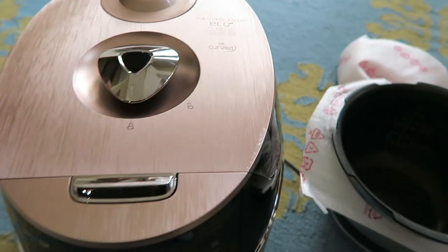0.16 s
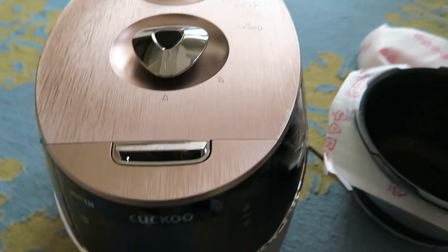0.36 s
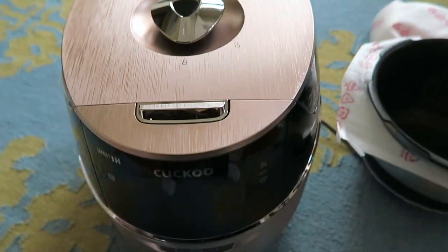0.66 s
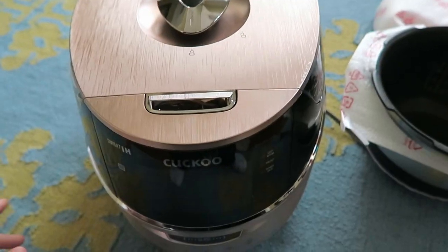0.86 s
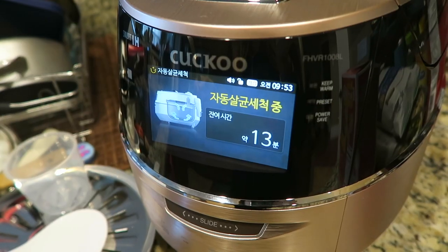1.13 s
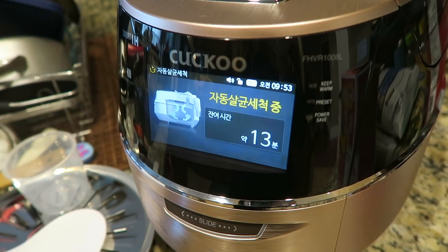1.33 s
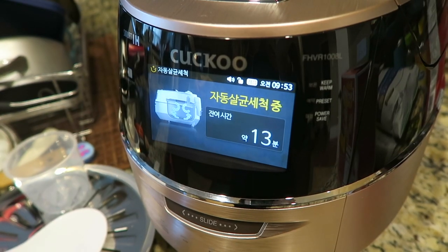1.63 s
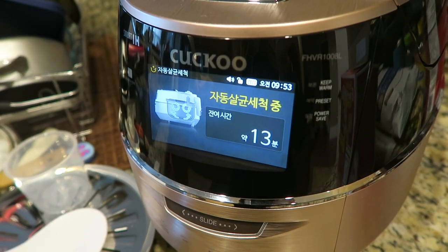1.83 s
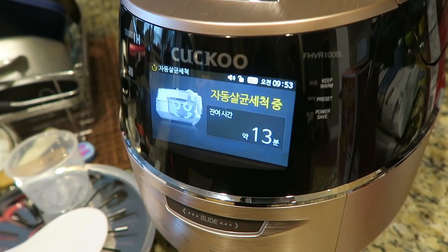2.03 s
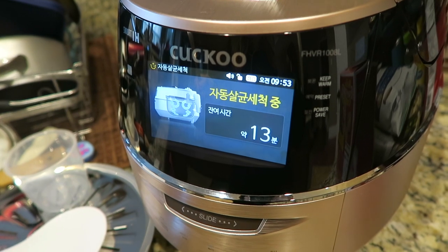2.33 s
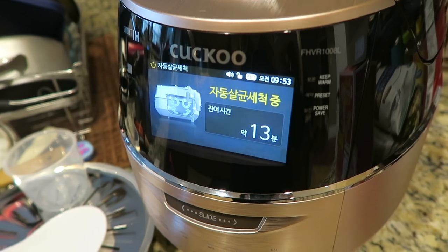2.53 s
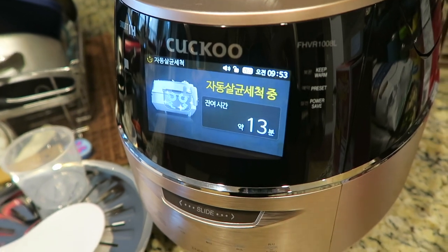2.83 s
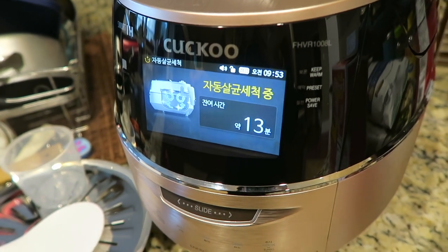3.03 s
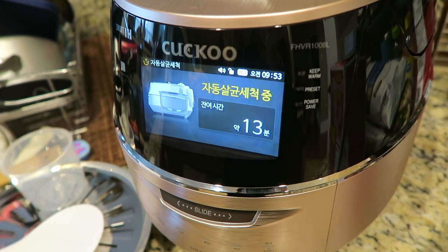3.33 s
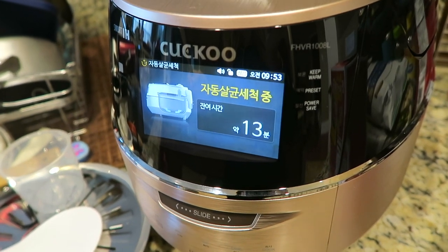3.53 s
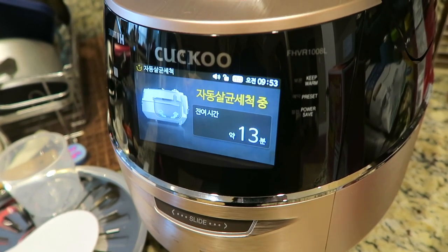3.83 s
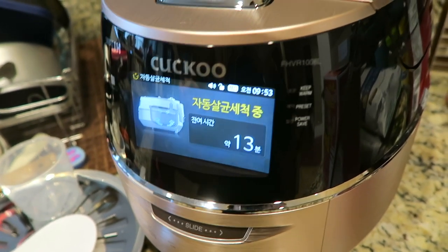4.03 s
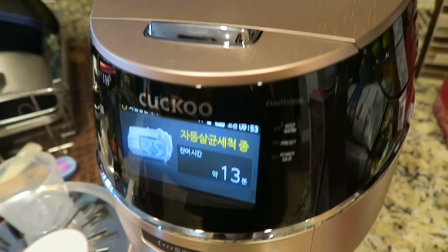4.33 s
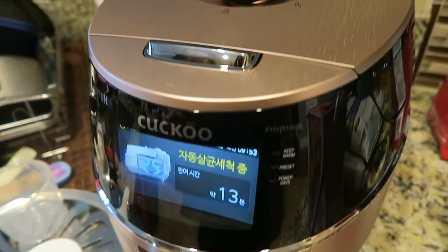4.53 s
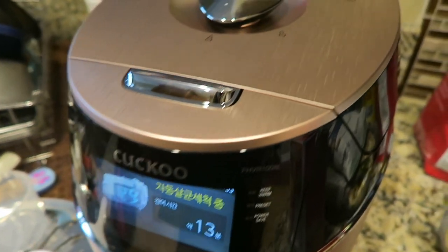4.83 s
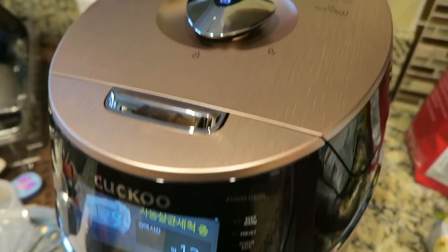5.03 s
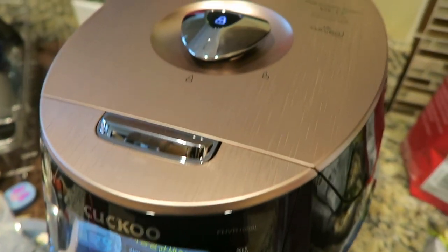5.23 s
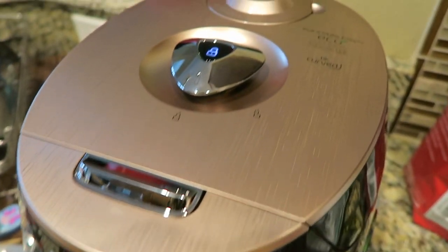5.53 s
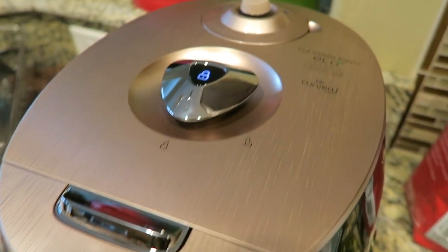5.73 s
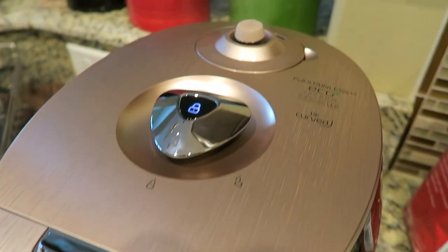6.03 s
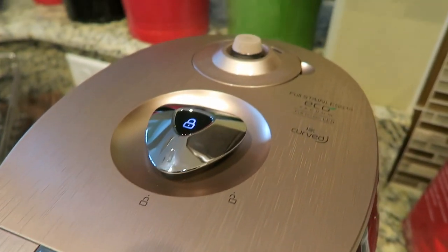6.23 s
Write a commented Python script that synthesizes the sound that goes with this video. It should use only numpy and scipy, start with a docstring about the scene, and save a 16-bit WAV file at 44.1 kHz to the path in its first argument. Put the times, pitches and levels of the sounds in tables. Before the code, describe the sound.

From 0 to 0.97 seconds the room is almost quiet: soft air and a faint low appliance hum that slowly sinks. A hand meets a cooker lid with a soft, dull knock at 0.04 and a weaker one at 0.13, and a light rustle slides off by about 0.25. At 0.97 it cuts abruptly to a loud, close rice cooker venting. Steam spurts in irregular puffs, about ten a second, bright and breathy with a rough sputter, never wholly stopping between them; sharper spurts come near 2.2 and 2.5. Boiling water rumbles low beneath, with small gurgles near 2.1, 4.6, 4.8 and 6.2. From 4 to 5.3 the microphone rises above the lid and the hiss changes colour. From about 5 a faint, thin, wavering mid-low tone lies underneath. Short reflections suggest a kitchen counter. Venting continues to the end, about 6.4.

```python
"""First a near-quiet room: an appliance hum, a soft knock of a hand on a lid, and a rustle as it slides off.
Then the scene changes: a rice cooker vents, its weighted valve rocking and letting out steam in uneven puffs,
about ten a second. The steam is noise shaped by valve flow, vent resonances and short echoes. Under it water
rumbles and gurgles (shaped noise), and late on a thin tone (a wavering sine) sounds. Hum and knock are steady
and decaying sines."""
import sys
import numpy as np
from scipy import signal
from scipy.fft import rfft, irfft, next_fast_len
from scipy.io import wavfile
from scipy.ndimage import uniform_filter1d, minimum_filter1d, map_coordinates

SR = 44100
rng = np.random.default_rng(int(sys.argv[2]) if len(sys.argv) > 2 else 0)


def inscribe(sig):
    """Save sig as 16-bit PCM at rate SR to the path in sys.argv[1].

    A 1-D sig is mono; a 2-D sig holds one channel per row.
    Samples are clipped to [-1, 1] before scaling.
    """
    pcm = np.round(np.clip(np.atleast_2d(sig).T, -1, 1) * 32767)
    wavfile.write(sys.argv[1], SR, pcm.astype(np.int16))


N = 281313


def amp(db):
    """Decibels to gain."""
    return 10 ** (np.asarray(db) / 20)


def unit(x):
    """Scale to rms 1."""
    return x / np.sqrt(np.mean(x ** 2) + 1e-20)


def along(points, hz):
    """Read (frequency, value) points on a log frequency axis."""
    f, v = np.transpose(points)
    return np.interp(np.log(hz + 1), np.log(f + 1), v)


def curves(rows):
    """Draw one value per sample for each column after the time."""
    s, *columns = np.transpose(rows)
    return [np.interp(np.arange(N) / SR, s, column) for column in columns]


def wobble(rate):
    """A smooth random curve, rate knots a second."""
    knots = rng.standard_normal(int(N * rate / SR) + 4)
    return map_coordinates(knots, [np.arange(N) * rate / SR])


def filtered(x, response):
    """Multiply the spectrum of x by a response of frequency, zero-padded against wrap-around."""
    m = next_fast_len(N + SR // 2)
    return irfft(rfft(x, m) * response(np.fft.rfftfreq(m, 1 / SR)), m)[..., :N]


def rush(spectrum, alike, patchy_db):
    """Turbulence: coloured stereo noise of rms 1 whose gain varies in random time-frequency patches."""
    z = signal.stft(rng.standard_normal((2, N)), nperseg=512)[2]
    field = rng.standard_normal(z.shape[1:])
    field = uniform_filter1d(uniform_filter1d(field, size=6, axis=0), size=6, axis=1)
    pair = signal.istft(z * amp(patchy_db * unit(field)), nperseg=512)[1][:, :N]

    def mid_side(hz):
        # this angle gives left and right the wanted correlation
        turn = np.arccos(np.clip(along(alike, hz), -1, 1)) / 2
        return amp(along(spectrum, hz)) * [np.cos(turn), np.sin(turn)]

    mid, side = filtered(pair, mid_side)
    return unit(np.array([mid + side, mid - side]))


# colour of the room air: (frequency [Hz], relative density [dB per Hz])
ROOM_COLOUR = [(25, -12), (141, -10.5), (192, -11), (260, -10), (445, -10), (620, -19.5), (980, -17.5),
               (1250, -25.5), (2500, -27.5), (11700, -48.5), (13000, -70)]
# stereo width of the room air: (frequency [Hz], left-right correlation [-1 to 1])
ROOM_WIDTH = [(40, .99), (130, 0.54), (290, -0.51), (950, -0.37), (3770, .05)]
ROOM_DB = -50
# appliance hum, before its drift and balance: (frequency [Hz], level [dB])
HUM_TONES = [(118, -64.5), (192, -50), (436, -59), (463, -66)]
# a hand meets the lid: (time [s], level [dB])
KNOCKS = [(.043, -30.5), (.135, -40.5)]
# ringing modes of the lid: (frequency [Hz], relative level [dB], 60 dB decay time [s])
LID_MODES = [(206, 1.5, 0.071), (456, 4, 0.049), (720, -2, 0.036)]
# the hand slides off: (time [s], level [dB])
RUSTLE_LEVEL = [(0, -63), (.06, -54.5), (.14, -59), (.24, -78)]
# colour of skin on the lid: (frequency [Hz], relative density [dB per Hz])
SKIN_COLOUR = [(500, -12), (1000, 0), (4000, -8), (15500, -26)]


def quiet_room():
    """Noise for room air, sinking sines for hum, decaying lid modes for the knock, noise for the rustle."""
    t = np.arange(N) / SR
    hum = np.zeros(N)
    for hz, db in HUM_TONES:
        level_db = db + 4.5 - 4.0 * t + 0.61 * wobble(15)  # sinks 4 dB a second
        hum += amp(level_db) * np.sin(2 * np.pi * hz * t + 0.83 * wobble(8.9))
    knock = np.zeros(N)
    for s, db in KNOCKS:
        u = np.maximum(t - s, 0)
        ring = sum(amp(level - 60 * u / t60) * np.sin(2 * np.pi * hz * u) for hz, level, t60 in LID_MODES)
        knock += amp(db) * ring * (1 - np.exp(-u / 0.0036))  # soft 3.6 ms onset
    rustle_gain = amp(curves(RUSTLE_LEVEL)[0] + 1.8 * wobble(154))
    rustle = rustle_gain * rush(SKIN_COLOUR, [(1000, 0.68)], patchy_db=3.5)
    air = amp(ROOM_DB) * rush(ROOM_COLOUR, ROOM_WIDTH, patchy_db=1.1)
    balance = amp([[-.3], [.3]])  # slightly to the right
    return air + (hum + knock) * balance + rustle


# puffs of flow: (valve lifts [s], valve drops [s], mean level [dB], swell from lift to drop [dB])
VALVE_PUFFS = [(0.959, 1.047, -17, -9), (1.077, 1.133, -13.5, 2), (1.179, 1.213, -11.5, -4),
               (1.263, 1.373, -16.5, -4), (1.402, 1.496, -17.5, 7), (1.508, 1.619, -18, 3.5),
               (1.638, 1.71, -16.5, 8), (1.768, 1.848, -16.0, 0), (1.859, 1.955, -17, 1),
               (1.98, 2.066, -16, 6.5), (2.104, 2.17, -16, -2), (2.202, 2.226, -9, 2),
               (2.244, 2.266, -11.0, -0.5), (2.266, 2.346, -26.5, 1), (2.363, 2.46, -21.0, -9.5),
               (2.488, 2.52, -10, -3.5), (2.572, 2.593, -16.5, -2.5), (2.586, 2.729, -21.5, 9),
               (2.776, 2.794, -25, 0), (2.836, 2.909, -15, 0.5), (2.925, 2.973, -16, -6),
               (3.016, 3.096, -14.5, -2.5), (3.149, 3.187, -16.5, 6.5), (3.209, 3.261, -19.0, -3),
               (3.289, 3.478, -18.5, -6.5), (3.496, 3.607, -18.5, -3), (3.627, 3.83, -19.5, -9.5),
               (3.827, 3.853, -12, 2), (3.882, 3.979, -17, 1.5), (4.001, 4.093, -16.5, -3.5),
               (4.111, 4.132, -18, -3.0), (4.16, 4.243, -17.5, -5.5), (4.269, 4.385, -18.0, 3),
               (4.383, 4.487, -20, 9), (4.497, 4.536, -20, -1), (4.537, 4.614, -17, 10),
               (4.63, 4.695, -15.5, -1.5), (4.723, 4.765, -12.0, -5), (4.803, 4.975, -22, -17),
               (4.999, 5.082, -17.5, 1.5), (5.106, 5.157, -14.0, -2), (5.167, 5.2, -13, -0.5),
               (5.206, 5.279, -18, 13), (5.306, 5.388, -18.5, 8.5), (5.42, 5.471, -14.0, 3.5),
               (5.483, 5.529, -15.5, -2), (5.537, 5.585, -14.5, -1.5), (5.628, 5.708, -15.5, 5.5),
               (5.714, 5.884, -17.0, 3.5), (5.929, 5.948, -13.5, 0), (6.011, 6.041, -14, 7.5),
               (6.082, 6.125, -12.5, 2), (6.166, 6.214, -12, -0.5), (6.253, 6.282, -23, -1),
               (6.31, 6.391, -19.5, 13)]
# slow colour of the steam: (time [s], treble level [dB], low blowing level [dB])
STEAM_COLOUR = [(1.0, 2, -2.5), (1.4, -0.8, 1.5), (2.0, -1.5, 1.1), (2.7, -2, -2.5), (3.2, 1.4, 0),
                (3.7, 1.4, -3.3), (4.2, 0.7, 3), (4.6, 0.6, -1.5), (5.0, 2, -3.5), (5.5, -0.3, -1.5),
                (5.7, 1.8, 4.5), (5.95, -3, -1), (6.15, 7, 3), (6.38, -0.5, -1.7)]
LEAK_DB = -32  # flow that slips past the seated valve
RISE_MS, FALL_MS = 8.6, 8  # time constants of the valve's S-shaped lift and drop
LOW_DB_PER_S, USUAL_STAY_S = 26.5, 0.082  # low breath gained per second open beyond the usual stay


def valve():
    """The weight lifts and drops: flow in dB, with treble and low colour; longer puffs breathe lower."""
    t = np.arange(0, N, 32) / SR
    lift, drop, level_db, swell_db = np.transpose(VALVE_PUFFS)[:, :, None]
    stay = drop - lift

    def edge(s, ms):
        return .5 + .5 * np.tanh(500 * s / ms)

    level_db = level_db + swell_db * (np.clip((t - lift) / stay, 0, 1) - .5)
    power = (amp(level_db) * edge(t - lift, RISE_MS) * edge(drop - t, FALL_MS)) ** 2
    total = power.sum(0) + amp(LEAK_DB) ** 2
    # overlapping puffs share the low breath by their power
    breath_db = (power * LOW_DB_PER_S * (stay - USUAL_STAY_S)).sum(0) / total
    flow_db, breath_db = curves(np.transpose([t, 10 * np.log10(total), breath_db]))
    bright_db, low_db = curves(STEAM_COLOUR)
    return flow_db, bright_db, low_db + breath_db


# core of the jet: (frequency [Hz], relative density [dB per Hz])
JET_COLOUR = [(500, -100), (1740, -18), (2750, 2.5), (3260, -6), (4490, -5), (5600, -16), (9000, -120)]
# fine turbulence of the jet: (frequency [Hz], relative density [dB per Hz])
FIZZ_COLOUR = [(2000, -100), (5000, -2), (6160, -2), (6900, -7), (8500, -20.5), (14000, -120)]
# thin top of the jet: (frequency [Hz], relative density [dB per Hz])
AIR_COLOUR = [(4000, -92), (8700, -2), (9900, -2), (11400, -7), (12500, -2), (13600, -4.5), (14300, -16),
              (15600, -34)]
# low blowing of the jet: (frequency [Hz], relative density [dB per Hz])
BLOW_COLOUR = [(250, -99), (680, -9), (1170, -11.5), (1500, -2), (1900, 0.5), (4000, -100)]
# stereo width of the jet: (frequency [Hz], left-right correlation [-1 to 1])
JET_WIDTH = [(380, 0.97), (950, .999), (2380, 0.99), (5980, 1), (15000, 0.81)]
# change in the thin top: (time [s], level [dB])
TOP_LEVEL = [(1, 0.5), (2.3, 4), (3.5, -2), (4.4, 0), (5.1, 0.5), (5.6, 1.3), (6.38, 2)]
# vent pipe and cap, peaks and dips: (centre [Hz], width [Hz], gain from below [dB], gain from above the lid [dB])
VENT_RESONANCES = [(2100, 96, 10, 1), (2146, 25, -1.5, 3.5), (2360, 110, 1.9, 5), (2770, 660, 0, 2.5),
                   (3285, 180, -4.5, -7), (3510, 80, 4, 5), (3790, 150, 4.5, -8.5), (4140, 150, -6.5, 1.5),
                   (4634, 280, 4.5, -3.5), (4900, 120, -5.5, 6), (5430, 300, -5, -5.5), (6110, 100, -1, 4)]
# phase between the sides: (frequency [Hz], left ahead of right [rad])
PORT_PHASE = [(1500, -0.055), (13000, -0.62)]
# the listening point rises over the lid: (time [s], share heard from above [0 to 1])
VIEW_FROM_ABOVE = [(4.0, 0.05), (5.3, 0.66)]


def steam():
    """The jet hisses through the vent's resonances; more flow makes it brighter, droplets make it sputter."""
    flow_db, bright_db, low_db = valve()
    swing_db = flow_db + 18.5  # flow against an ordinary puff
    sputter_db = 1.12 * wobble(45) + 1.12 * wobble(260)

    core = amp(flow_db + sputter_db - 1.32) * rush(JET_COLOUR, JET_WIDTH, patchy_db=1.0)

    fizz_db = -30 + 1.27 * swing_db + bright_db + 1.2 * sputter_db
    fizz = amp(fizz_db) * rush(FIZZ_COLOUR, JET_WIDTH, patchy_db=2.5)

    # the thin top never falls silent, even between puffs
    thin = np.hypot(amp(-46 + swing_db + 1.2 * bright_db), amp(-63.0))
    flicker = amp(curves(TOP_LEVEL)[0] + 1.5 * wobble(200))
    air = thin * flicker * rush(AIR_COLOUR, JET_WIDTH, patchy_db=4.0)

    blow_db = -35.5 + 0.85 * swing_db + low_db + 0.49 * sputter_db
    blow = amp(blow_db) * rush(BLOW_COLOUR, JET_WIDTH, patchy_db=3.0)

    def vent(hz, k):
        ports = np.exp(.5j * along(PORT_PHASE, hz) * [[1], [-1]])
        gain_db = sum(db[k] / (1 + (2 * (hz - c) / w) ** 2) for c, w, *db in VENT_RESONANCES)
        return ports * amp(gain_db)

    jet = core + fizz + air + blow
    below, above = (filtered(jet, lambda hz: vent(hz, k)) for k in range(2))
    heard = below + curves(VIEW_FROM_ABOVE)[0] * (above - below)
    return walls(heard) * amp([[-.27], [.27]])  # slightly to the right


# reflections from counter and walls: (mean delay [ms], level [dB])
WALL_ECHOES = [(2.7, -30.5), (4.9, -19.5), (8.3, -17), (13.1, -19)]


def walls(x):
    """Short echoes with slowly drifting delays comb the spectrum into fine ripples that shift."""
    out = x.copy()
    for ms, db in WALL_ECHOES:
        late = np.arange(N) - (ms + 0.1 * wobble(1.072)) * SR / 1000
        out += amp(db) * np.array([map_coordinates(side, [late]) for side in x])
    return out


# water boiling in the pot, before a 1 dB lift: (time [s], level [dB])
BOIL_LEVEL = [(.97, -42.5), (1.2, -48), (2.08, -43), (2.35, -47.5), (5.05, -47), (5.75, -44), (6.05, -43.5),
              (6.38, -49.5)]
# colour of the boil: (frequency [Hz], relative density [dB per Hz])
POT_COLOUR = [(15, -40), (30, -13), (60, -5), (124, -7.5), (236, 2.5), (334, -2.5), (508, -7), (600, -12),
              (1100, -11.5), (2200, -82)]
# stereo width of the boil: (frequency [Hz], left-right correlation [-1 to 1])
POT_WIDTH = [(60, .997), (170, .95), (500, .76)]
# water in the vent: (time [s], level [dB])
GURGLE_BURSTS = [(2.12, -40.5), (4.64, -43), (4.83, -42.5), (6.2, -39.5)]
# a thin tone near the cooker: (time [s], level [dB])
DRONE_LEVEL = [(5.0, -60), (5.3, -50.5), (5.75, -48), (6.38, -57)]
DRONE_HZ = 436  # centre of its wavering pitch


def pot():
    """Boiling rumbles in the pot, water gurgles in the vent in bursts, and a thin wavering sine lies on top."""
    t = np.arange(N) / SR
    rumble = amp(curves(BOIL_LEVEL)[0] + 1.0 + 1.0 * wobble(10)) * rush(POT_COLOUR, POT_WIDTH, patchy_db=1.2)
    bursts = sum(amp(db) * np.exp(-((t - s) / 0.045) ** 2) for s, db in GURGLE_BURSTS)
    gurgle_colour = [(400, -15), (520, -11.5), (720, 2), (1300, -66)]  # (frequency [Hz], density [dB per Hz])
    gurgle = bursts * rush(gurgle_colour, JET_WIDTH, patchy_db=0.5)
    phase = 2 * np.pi * np.cumsum(DRONE_HZ + 1.4 * wobble(5)) / SR
    drone = amp(curves(DRONE_LEVEL)[0] + 2.2 * wobble(7)) * np.sin(phase + [[0], [1.2]])
    return rumble + gurgle + drone


VENTING_S = .9735  # midpoint of the crossfade


def scene():
    """The quiet room crossfades to the venting cooker within 9 ms."""
    venting = np.clip((np.arange(N) / SR - VENTING_S) / .009 + .5, 0, 1)
    return (1 - venting) * quiet_room() + venting * (steam() + pot())


# narrow treble dip of the microphone: (centre [Hz], width [Hz], gain [dB])
TREBLE_DIP = (12980, 220, -14)
CEILING = .78  # limiter ceiling ahead of the filter, share of full scale
TOP_HZ = 15680  # band limit


def record(dry):
    """A limiter turns down the loudest peaks; the microphone has a narrow treble dip and a band limit."""
    needed = np.minimum(1, CEILING / (np.abs(dry).max(0) + 1e-9))
    gain = uniform_filter1d(minimum_filter1d(needed, size=257), size=129)  # hold, then smooth
    centre, width, db = TREBLE_DIP

    def microphone(hz):
        dip = amp(db / (1 + (2 * (hz - centre) / width) ** 2))
        return dip * (hz < TOP_HZ)

    return filtered(dry * gain, microphone)


dry = scene()
out = record(dry)
inscribe(out)
```